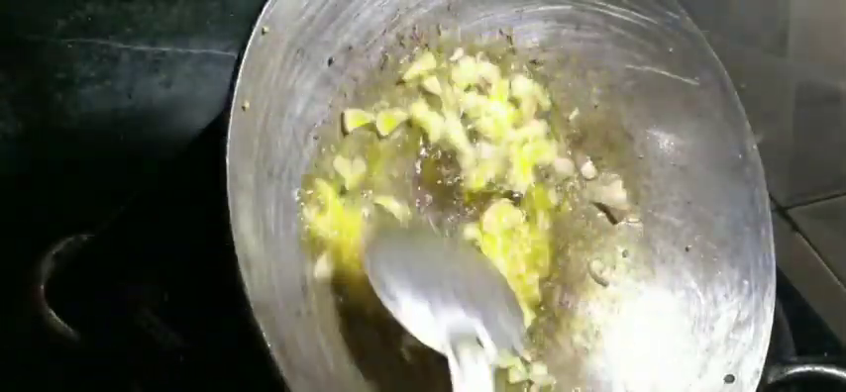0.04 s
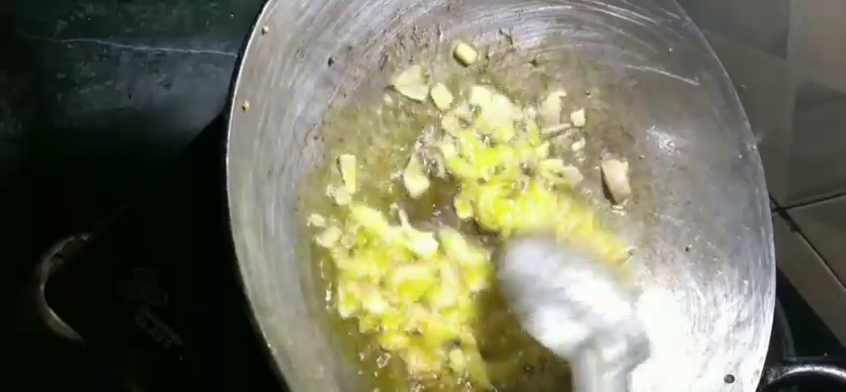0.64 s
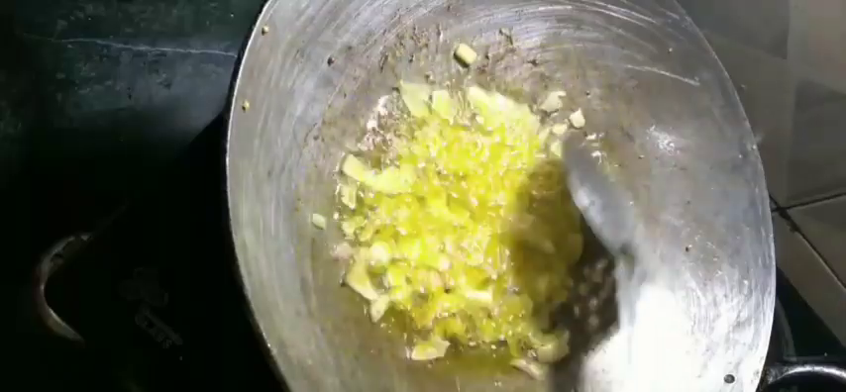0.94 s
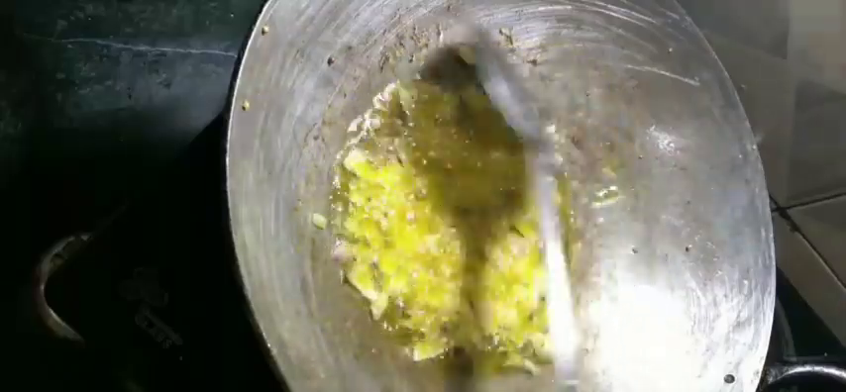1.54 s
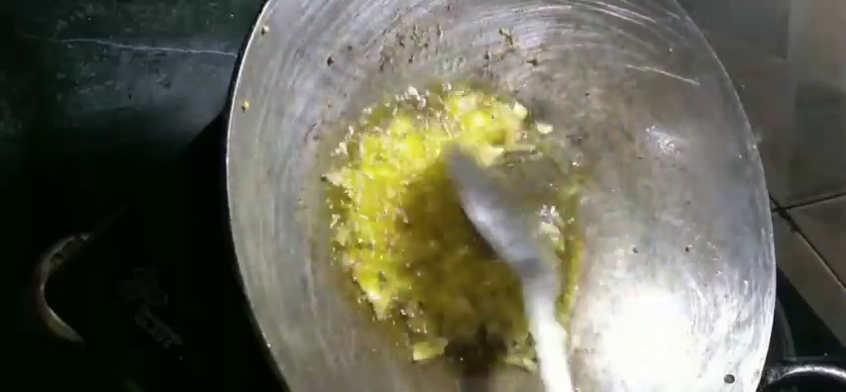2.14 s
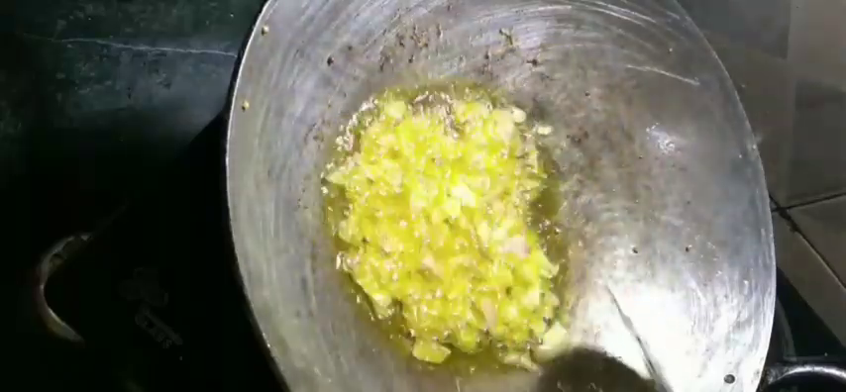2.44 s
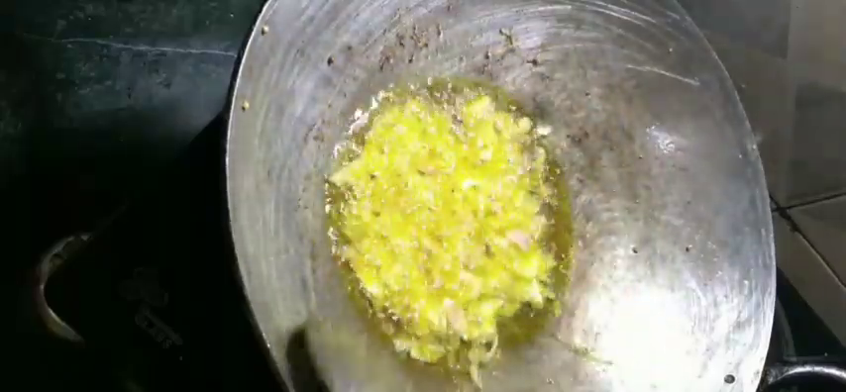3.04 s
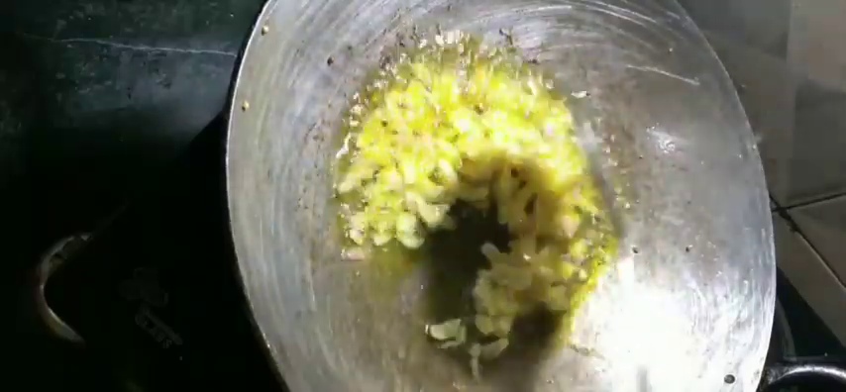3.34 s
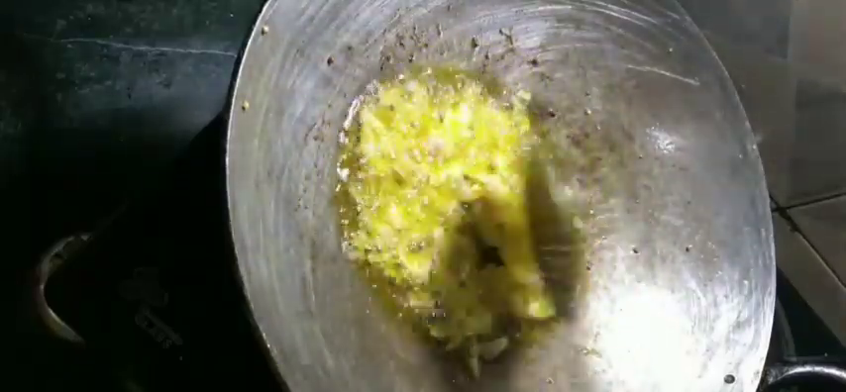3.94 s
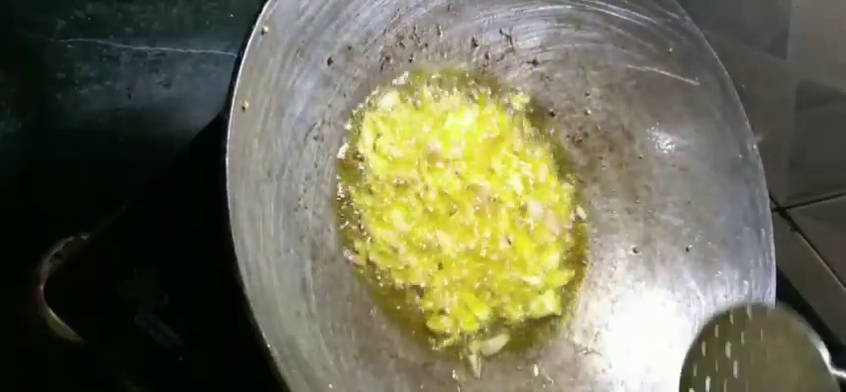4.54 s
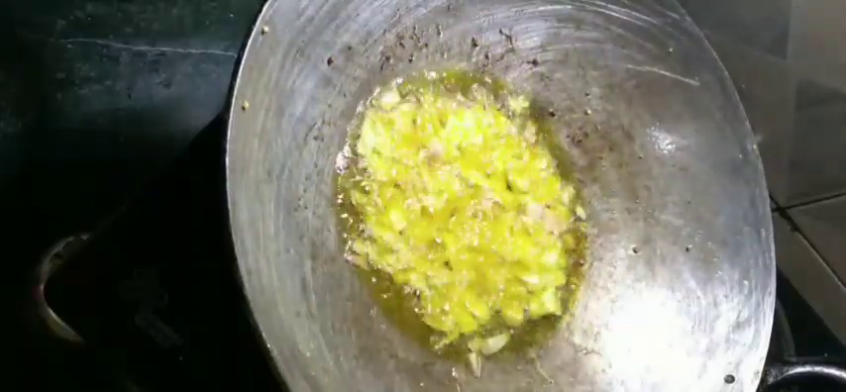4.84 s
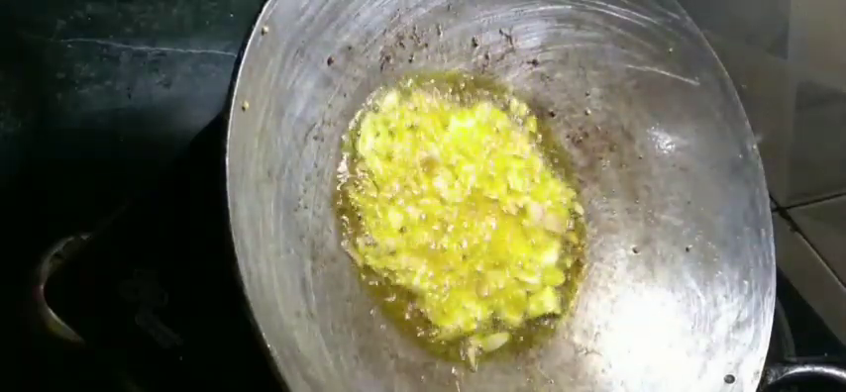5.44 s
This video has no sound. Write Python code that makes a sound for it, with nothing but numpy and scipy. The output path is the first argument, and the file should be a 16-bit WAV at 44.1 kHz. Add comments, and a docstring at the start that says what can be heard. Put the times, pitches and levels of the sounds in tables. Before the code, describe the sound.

Hot oil fizzes and spits around frying onion, with a metal spoon tapping and scraping the pan before the sizzle settles.

```python
"""Chopped onion sizzles in hot oil in a wide metal pan, close to the microphone in a small kitchen.
Its water boils into countless steam bubbles, each bursting as a short damped oscillation; the oil spits.
A metal spoon scrapes through the onion and knocks twice on the pan, exciting the modes of the metal.
The sizzle is fierce while the onion is turned over, then settles above the low drone of the flame."""
import sys
import numpy as np
from scipy import signal
from scipy.fft import rfft, irfft, next_fast_len
from scipy.io import wavfile

SR = 44100
rng = np.random.default_rng(int(sys.argv[2]) if len(sys.argv) > 2 else 0)


def log_audio(samples):
    """Write samples as a 16-bit WAV file to the path given in sys.argv[1]."""
    # one column per channel
    frames = np.atleast_2d(samples).T
    # limit to full scale, then quantise
    limited = np.clip(frames, -1, 1)
    pcm = np.round(limited * 32767).astype(np.int16)
    wavfile.write(sys.argv[1], SR, pcm)


N = 246078

# Levels in the tables are relative: each source applies its own gain.
# spectral envelope of the frying: frequency_hz, gain_db
SIZZLE_SPECTRUM = [(200, -47), (420, -12.5), (600, -9), (800, -10), (1100, -8), (2600, -1.5), (4500, 1),
                   (6800, -2.5), (9500, -5), (11000, -10.5), (15500, -6.5)]
# the spoon turns fresh onion into the oil: start_s, length_s, fizz_gain_db, crackle_gain_db
ONION_TURNS = [(0.17, 0.12, 4, -7), (0.55, 0.15, 1.5, 2), (0.945, 0.17, 4, 3.5), (1.485, 0.45, 3, 4),
               (2.45, 0.26, 1.5, 3), (2.741, 0.089, 6.5, 3.5), (3.365, 0.44, 5, 0), (3.615, 0.47, 5, 2.5),
               (3.907, 0.41, 0, 8), (4.083, 0.11, 6, -1), (4.69, 0.19, 2, 5), (4.892, 0.088, 6, 4.5)]
# single spits of oil: start_s, level_db, pitch_hz
OIL_SPITS = [(0.024, -28, 5930), (0.059, -10, 3600), (0.119, -19, 5800), (0.1789, -9, 4960),
             (0.3078, -11.5, 4500), (0.333, -13, 4500), (0.5515, -24, 4000), (0.5866, -10.5, 5070),
             (0.764, -13.5, 4660), (0.8201, -10.5, 3780), (1.029, -9.5, 4000), (1.0814, -7.5, 3760),
             (1.1432, -16, 2730), (1.541, -16.5, 2700), (1.877, -15, 5330), (1.904, -21, 7000),
             (1.945, -14.5, 6750), (2.348, -18, 8900), (2.3915, -13.5, 7500), (2.739, -14.5, 2950),
             (3.312, -16, 7600), (3.4297, -10.5, 6600), (3.621, -19.5, 3130), (3.9273, -13.5, 4030),
             (4.08, -23, 3320), (4.1177, -14, 4530), (4.2581, -18.5, 4530), (4.342, -13, 4900),
             (4.5146, -18.5, 3180), (4.7746, -15.5, 4000), (5.084, -17, 6850), (5.1905, -16, 7340),
             (5.3652, -16.5, 6300)]
# larger bubbles that ring as they burst: start_s, level_db, pitch_hz, decay_cycles, echo_db
RINGING_BUBBLES = [(2.2468, -11.5, 3900, .7, -7), (5.3853, -14.5, 3600, 1.5, -3),
                   (5.4607, -18.5, 4800, 1.1, -2)]
# short gritty bursts of hiss: start_s, length_s, level_db, pitch_hz
HISS_BURSTS = [(0.049, 0.027, -39, 3620), (2.041, 0.025, -38, 2720), (2.132, 0.018, -32, 3730),
               (2.501, 0.016, -39, 3970), (2.741, 0.021, -42, 3400), (2.95, 0.04, -42, 3100),
               (4.636, 0.028, -42, 2540)]
# envelope of the onion being pushed about: time_s, level_db
STIRRING_LEVELS = [(0, -55.5), (.25, -48.5), (.8, -53), (1.5, -50), (2.1, -63.5), (2.55, -54), (4.1, -61.5),
                   (4.5, -69)]
# light taps of spoon and onion on the pan: start_s, level_db, pitch_hz
LIGHT_TAPS = [(0.178, -5.5, 2000), (0.2064, -1.5, 2300), (.2705, -8.5, 1390), (.629, -19, 1200),
              (0.934, -2.5, 1710), (1.029, -5.5, 2000), (1.392, 0, 2000), (1.829, -8, 2140),
              (2.0409, -12, 2500), (3.3249, -15, 1800), (3.4457, -13, 2200), (3.774, -15.5, 1570),
              (3.8555, -12.5, 2300), (3.984, -8, 2360), (4.666, -13.5, 1490), (5.154, -16, 2020)]
# the spoon drags over the pan: start_s, length_s, level_db, pitch_hz, quality_factor
SPOON_SCRAPES = [(0.181, 0.16, -27.5, 2920, 1.4), (0.259, 0.03, -28, 1250, 1.4),
                 (0.269, 0.023, -30, 520, 0.9), (0.31, 0.017, -24.5, 4170, 2.2),
                 (1.084, 0.029, -25, 2550, 1.7), (3.029, 0.041, -32, 1140, 0.91),
                 (3.036, 0.037, -32.5, 4300, 0.92), (3.263, 0.081, -41, 1400, 2.2),
                 (3.298, 0.066, -37.5, 2200, 3.4)]
# the spoon strikes the pan: start_s, clang_db, ring_db, tilt_db_per_octave, chatter_s, spot_index
SPOON_KNOCKS = [(.9585, -19.5, -15.5, 1, .01, 0), (1.392, -17.5, -12.5, -.6, .006, 1)]
# modes of spoon and pan, struck at either of two spots: frequency_hz, spot_0_db, spot_1_db, t60_s
METAL_MODES = [(786, -12, -12, .13), (3494, -5, -10, .1), (3903, -5, -.5, .09), (4375, -6, -.5, .08),
               (4502, -7, -2.5, .18), (4624, 1, -3, .1), (5170, 0, -7, .09), (6095, -4, -10, .1),
               (6600, -6, -7, .13), (7090, -6, -9, .22), (7620, -9, -7, .1), (8250, -8, -16, .1),
               (8750, -11, -9, .11), (9712, 0, -9, .11)]
# spectral envelope of the pan's dense modes: frequency_hz, gain_db
CLANG_SPECTRUM = [(100, 0), (500, -18), (780, 5.5), (1200, -14), (2300, -3.5), (7500, 1), (9500, -5),
                  (10400, -7), (15000, -28)]
# thuds of the pan on its stand: start_s, level_db, t60_s, body_hz
PAN_THUMPS = [(.179, -30.5, 0.062, 140), (0.269, -34.5, 0.21, 210), (0.499, -30, 0.056, 140),
              (0.96, -25.5, 0.083, 150), (1.029, -25, 0.063, 140), (1.391, -26.5, 0.12, 210)]
# the whole pan gives under the spoon: start_s, level_db, rise_s
PAN_PUSHES = [(0.497, -29, 0.0087), (0.959, -22, 0.0093), (1.029, -32, 0.0029)]
# spectral envelope of the burner's rumble: frequency_hz, gain_db
RUMBLE_SPECTRUM = [(15, -4), (30, 4), (45, -9), (70, -12), (100, -9), (135, -17.5), (175, -8.5), (215, -21),
                   (320, -25), (3000, -38.5)]
# the flame surges or sinks: start_s, length_s, gain_db
FLAME_SURGES = [(1.546, 0.88, -7.5), (3.08, .36, 6), (4.276, 0.606, 9), (5.14, 0.46, 3.5)]
# unequal response of the two microphone ports: frequency_hz, left_minus_right_db
PORT_BALANCE = [(160, -0.5), (450, -3.5), (770, 1), (1200, -2.5), (6400, 1.5), (9800, -6), (15000, 0.5)]


def sizzle():
    """Bubble size sets pitch: small bubbles fizz, large ones crackle; drops above the oil snap."""
    fizz = boiling(np.geomspace(3500, 12500, num=11), per_s=550, spread_db=2.5,
                   surge_db=5, surge_per_s=40, cycles=0.93, echo_db=4.5)
    crackle = boiling(np.geomspace(650, 3000, num=9), per_s=240, spread_db=2,
                      surge_db=3.5, surge_per_s=40, cycles=0.87, echo_db=0.5)
    snaps = boiling(np.geomspace(1800, 7500, num=6), per_s=9, spread_db=4,
                    surge_db=0.8, surge_per_s=10, cycles=0.25, echo_db=-9, cap=2.5)
    fizz_gain = amp(-28.5 - settling(drying_db_per_s=1.12) + flares(column=2))
    crackle_gain = amp(-34 - settling(drying_db_per_s=0.11) + flares(column=3))
    snap_gain = np.sqrt(fizz_gain * crackle_gain)
    flutter = amp(0.29 * wander(N, per_s=49))
    return flutter * (fizz * fizz_gain + crackle * crackle_gain + snaps * snap_gain)


def boiling(pitches_hz, per_s, spread_db, surge_db, surge_per_s, cycles, echo_db, cap=5.14):
    """Shot noise: each spot in the oil bursts bubbles of one size at random and surges independently."""
    out = np.zeros((2, N))
    for hz in pitches_hz:
        bursts = unit(clicks(N, per_s, spread_db, cap) * amp(surge_db * lumps(N, surge_per_s)))
        pop = from_pan(bubble(hz, cycles), echo_db)
        out += np.sqrt(hz) * signal.oaconvolve(bursts[None], pop / np.linalg.norm(pop), axes=1)[:, :N]
    return unit(coloured(out, SIZZLE_SPECTRUM))


def bubble(hz, cycles):
    """Damped oscillation of a bursting bubble, peak 1; its time constant is given in cycles."""
    t = np.arange(SR // 100) / SR
    age = t * hz / cycles
    decay = np.exp(-age)
    swing = np.sin(2 * np.pi * hz * t) * np.sqrt(age) * decay
    swing -= swing.sum() * decay / decay.sum()  # no net pressure
    swing = softened(np.pad(swing, (SR // 1000, 0)))
    return swing / abs(swing).max()


def flares(column, rise_share=0.28):
    """Evaporation follows each turn of the onion: a triangular change in level, in dB."""
    t = np.arange(N) / SR
    return sum(turn[column] * np.interp((t - turn[0]) / turn[1], [0, rise_share, 1], [0, 1, 0])
               for turn in ONION_TURNS)


def settling(drying_db_per_s, rest_db=8, start_s=1.21, time_constant_s=0.48):
    """Loss in dB: exponential relaxation as the onion comes to rest, plus steady drying."""
    t = np.arange(N) / SR
    return rest_db * (1 - np.exp(-np.maximum(t - start_s, 0) / time_constant_s)) + drying_db_per_s * t


def spits():
    """Isolated transients: single loud bursts in the oil, the larger bubbles ringing at resonance."""
    out = np.zeros((2, N))
    for start_s, db, hz in OIL_SPITS:
        add(out, start_s, amp(db + 3) * from_pan(bubble(hz, cycles=0.38), echo_db=-4.5, lag_samples=1))
    for start_s, db, hz, cycles, echo_db in RINGING_BUBBLES:
        plop = resonance(bubble(hz, cycles), hz, q=1.2)
        add(out, start_s, amp(db) * from_pan(plop, echo_db, lag_samples=1))
    return out


def hiss_bursts():
    """Dense shot noise: short gritty bursts of hiss, from sizzling onion or the spoon brushing the pan."""
    out = np.zeros((2, N))
    for start_s, length_s, db, hz in HISS_BURSTS:
        hiss = flurry(length_s, hz, per_s=2500, spread_db=3, q=1.9)
        add(out, start_s, amp(db + 6) * from_pan(hiss, echo_db=-1.5))
    return out


def stirring(squelch_hz=270):
    """Soft impacts carry little treble: pieces tumble in the oil with a low, lumpy patter."""
    slides = clicks(N, per_s=320, spread_db=1) * amp(4 * lumps(N, per_s=23))
    patter = from_pan(resonance(slides, squelch_hz, q=0.56), echo_db=-11, hollow_gain=1)
    times_s, levels_db = np.transpose(STIRRING_LEVELS)
    return unit(patter[:, :N]) * amp(np.interp(np.arange(N) / SR, times_s, levels_db))


def taps():
    """Impulse excitation: short, dull contacts stir the cavity resonance of the pan."""
    out, t = np.zeros((2, N)), np.arange(SR // 100) / SR
    for start_s, db, hz in LIGHT_TAPS:
        contact = np.exp(-4.5 * hz * t) * np.cos(2 * np.pi * hz * t)
        click = softened(np.pad(contact, (SR // 1000, 0)))
        tap = 2 * resonance(click, hz, q=0.77) / abs(click).max()
        add(out, start_s, amp(db - 5.5) * from_pan(tap, echo_db=-3.5))
    return out


def scrapes():
    """Stick-slip friction: the spoon moves in tiny jerks, its pressure damping cavity and metal."""
    out = np.zeros((2, N))
    for start_s, length_s, db, hz, q in SPOON_SCRAPES:
        slips = amp(db - 7.5) * flurry(length_s, hz, per_s=1500, spread_db=3.5, q=q)
        add(out, start_s, from_pan(slips, echo_db=5.5, hollow_gain=0.5))
        add(out, start_s, amp(-19) * signal.fftconvolve(slips[None], metal_ring(spot=0), axes=1))
    return out


def knocks(clang_t60_s=0.19, ring_rise_s=0.00044):
    """Impact on a plate: the spoon gives a crack, a clang of overlapping modes and distinct ringing."""
    out, t = np.zeros((2, N)), np.arange(SR // 3) / SR
    for start_s, clang_db, ring_db, tilt, chatter_s, spot in SPOON_KNOCKS:
        spectrum = [(hz, db + tilt * np.log2(hz / 5000)) for hz, db in CLANG_SPECTRUM]
        decay = amp(-60 * np.maximum(t - chatter_s, 0) / clang_t60_s)  # held while the spoon chatters
        clang = unit(coloured(diffuse(len(t)), spectrum)) * decay
        ring = metal_ring(spot) * np.minimum(t / ring_rise_s, 1)
        add(out, start_s, amp(clang_db) * clang + amp(ring_db) * ring / ring[:, :SR // 100].std())
        crack = from_pan(bubble(1800, cycles=0.25), echo_db=4)
        add(out, start_s - 0.001, amp(clang_db + 2) * crack)
    return out


def metal_ring(spot):
    """Modal superposition: the spot struck sets the strength of each decaying mode of the metal."""
    t = np.arange(SR // 3) / SR
    modes = np.zeros((2, len(t)))
    for hz, *spot_db, t60_s in METAL_MODES:
        phase = rng.random() + rng.random((2, 1)) / np.pi  # in cycles, one for each channel
        modes += amp(spot_db[spot] - 60 * t / t60_s) * np.sin(2 * np.pi * (hz * t + phase))
    return modes / np.linalg.norm(modes[0])


def clack(start_s=1.4595, pitch_hz=2550, cutoff_hz=2800):
    """A heavily damped resonance, cut off steeply above: a dry clack after the second knock."""
    out = np.zeros((2, N))
    blow = resonance(signal.unit_impulse(SR // 100), pitch_hz, q=2.4)
    blow = signal.sosfilt(signal.butter(12, cutoff_hz, fs=SR, output="sos"), blow)
    blow *= amp(-6.5) / abs(blow).max()
    add(out, start_s,
        from_pan(blow, echo_db=-2, lag_samples=1, bowl_t60_s=0.04, room_db=-8, hollow_gain=1))
    return out


def thumps():
    """Rigid-body motion: the pan thuds on its stand, and a hard shove displaces a slow pulse of air."""
    out, t = np.zeros((2, N)), np.arange(SR // 3) / SR
    for start_s, db, t60_s, body_hz in PAN_THUMPS:
        body = unit(resonance(diffuse(len(t)), body_hz, q=0.9))
        attack = 1 - np.exp(-2 * t * body_hz)
        add(out, start_s, amp(db - 60 * t / t60_s) * body * attack)
    for start_s, db, rise_s in PAN_PUSHES:
        push = resonance(-t / rise_s * np.exp(1 - t / rise_s), hz=40, q=0.11)
        add(out, start_s, amp(db) * np.array([push, push]))
    return out


def burner(drone_hz=87, waver_hz=1.8, ramp_s=0.037):
    """Combustion noise: the flame drones unsteadily, and its rumble swells slightly with the drone."""
    t = np.arange(N) / SR
    strength = amp(sum(db * np.clip(np.minimum(t - start_s, start_s + length_s - t) / ramp_s + 0.5, 0, 1)
                       for start_s, length_s, db in FLAME_SURGES))
    rumble = unit(coloured(diffuse(N), RUMBLE_SPECTRUM) * strength ** 0.096)
    phase = 2 * np.pi * np.cumsum(drone_hz + waver_hz * wander(N, per_s=8.7)) / SR
    octave = amp(-13) * wander(N, per_s=9.4) * np.sin(2 * phase)
    drone = strength * unit(np.sin(phase) + octave)
    return amp(-47.5) * rumble + amp(-56.5) * drone


def from_pan(x, echo_db, lag_samples=3, bowl_t60_s=0.025, room_db=-3, hollow_gain=2.95):
    """Multipath propagation: direct sound plus bowl and kitchen echoes, coloured by the pan's cavity."""
    t = np.arange(SR // 4) / SR
    paths = np.zeros((2, len(t)))
    for t60_s, db in ((bowl_t60_s, 2.5 + echo_db), (0.28, room_db)):
        tail = diffuse(len(t)) * amp(-60 * t / t60_s) * (t > 0.0005)
        paths += amp(db) * unit(tail) / np.sqrt(len(t))
    # the direct sound reaches the left port a few samples late
    paths[1, 0] += 1
    paths[0, lag_samples + rng.integers(3)] += 1
    paths += hollow_gain * resonance(paths, hz=790, q=12)
    return signal.fftconvolve(x[None], paths, axes=1)


def diffuse(count, corner_hz=900, bass_side=0.4):
    """A diffuse field: noise alike in both channels in the bass, uncorrelated in the treble."""
    mid, side = rng.standard_normal((2, count))
    side = filtered(side, lambda f: np.hypot(bass_side, f / corner_hz) / np.hypot(1, f / corner_hz))
    return np.array([mid + side, mid - side])


def flurry(length_s, hz, per_s, spread_db, q):
    """Band-passed shot noise with a sharp attack and a Gaussian decay."""
    age = np.arange(SR // 4) / SR / length_s
    envelope = np.minimum(age * 10, 1) * np.exp(-age ** 2)
    return unit(softened(resonance(clicks(len(age), per_s, spread_db), hz, q))) * envelope


def clicks(count, per_s, spread_db, cap=3):
    """A Poisson process of impulses: many small, a few up to cap * spread_db decibels larger."""
    size = amp(spread_db * np.minimum(rng.exponential(1, count), cap))
    return size * (rng.random(count) < per_s / SR) * rng.choice([-1, 1], count)


def wander(count, per_s):
    """Random modulation of rms 1, interpolated between Gaussian values."""
    knots = rng.standard_normal(400)
    return unit(np.interp(np.arange(count) / SR * per_s, np.arange(len(knots)), knots))


def lumps(count, per_s):
    """Random modulation with its crests clipped."""
    return np.minimum(wander(count, per_s), 1.3)


def resonance(x, hz, q):
    """A second-order resonator with peak gain 1."""
    return filtered(x, lambda f: 1 / (1 + 1j * q * (f / hz - hz / f)))


def softened(x, corner_hz=10000, shelf_power=0.038):
    """A shelving filter: the top octave steps down to a faint floor."""
    return filtered(x, lambda f: np.sqrt(shelf_power + 1 / (1 + (f / corner_hz) ** 10)))


def coloured(x, points):
    """Spectral shaping by a curve through (frequency_hz, gain_db) points."""
    hz, db = np.transpose(points)
    return filtered(x, lambda f: amp(np.interp(np.log(f), np.log(hz), db)))


def filtered(x, response):
    """Linear filtering: the spectrum is multiplied by a frequency response."""
    size = next_fast_len(x.shape[-1] + 2048)
    hz = np.fft.rfftfreq(size, 1 / SR) + 1  # kept above zero for ratios and logarithms
    return irfft(rfft(x, size) * response(hz), size)[..., :x.shape[-1]]


def amp(db):
    """Decibels to amplitude ratio."""
    return 10 ** (np.asarray(db) / 20)


def unit(x):
    """Normalisation to rms 1."""
    return x / np.sqrt(np.mean(x ** 2) + 1e-20)


def add(mix, start_s, sound):
    """Superposition of a stereo sound on the mix from start_s on."""
    part = mix[:, max(round(start_s * SR), 0):][:, :sound.shape[1]]
    part += sound[:, :part.shape[1]]


def scene():
    """Linear superposition: the pressures from frying, spoon and flame add."""
    return (sizzle() + spits() + hiss_bursts() + stirring() + taps()
            + scrapes() + knocks() + clack() + thumps() + burner())


def record(dry, cutoff_hz=16200):
    """Microphone response: each port colours its channel, then a low-pass limits the bandwidth."""
    ports = np.array([coloured(channel, [(hz, side * db / 2) for hz, db in PORT_BALANCE])
                      for channel, side in zip(dry, (1, -1))])
    low_pass = signal.firwin(511, cutoff_hz, window=("kaiser", 9), fs=SR)
    return signal.oaconvolve(ports, low_pass[None], "same", axes=1)


dry = scene()
out = record(dry)
log_audio(out)
```